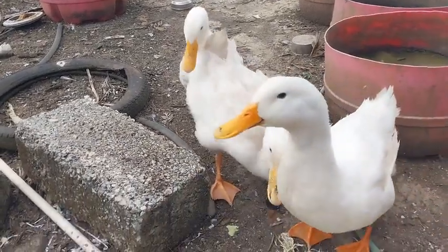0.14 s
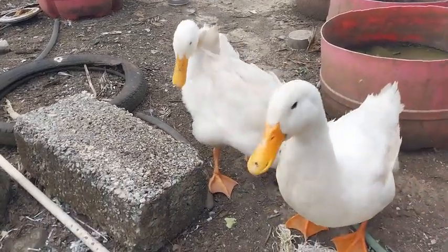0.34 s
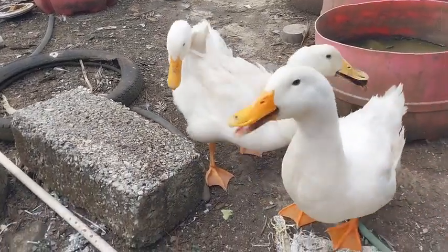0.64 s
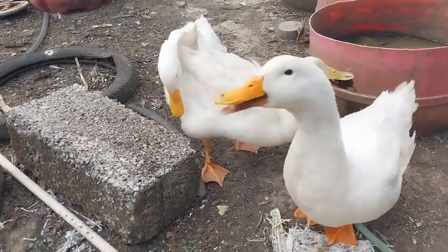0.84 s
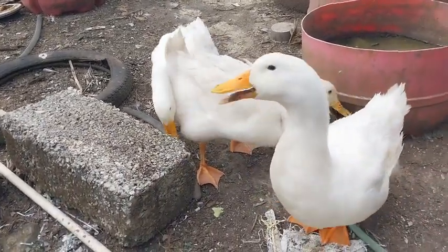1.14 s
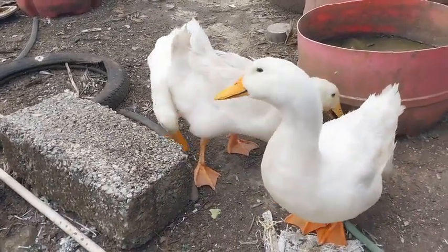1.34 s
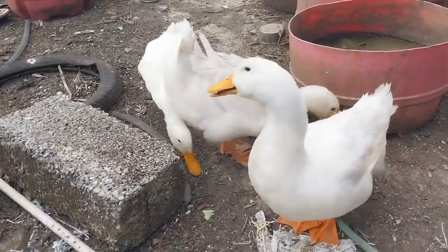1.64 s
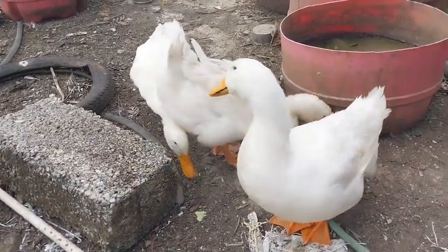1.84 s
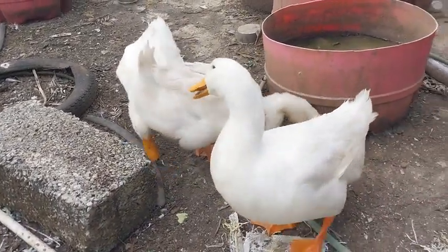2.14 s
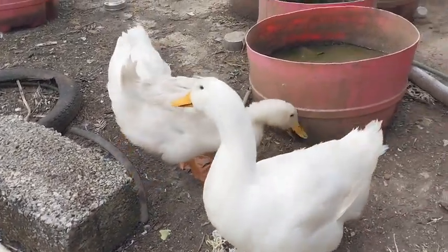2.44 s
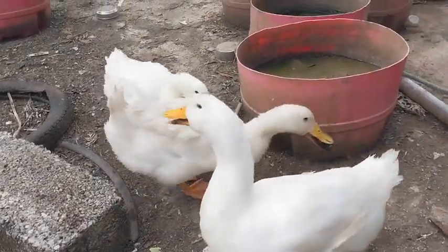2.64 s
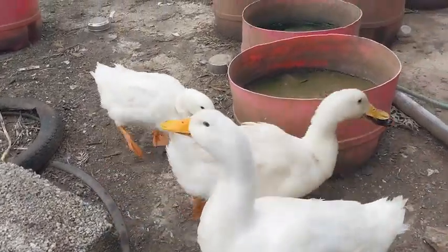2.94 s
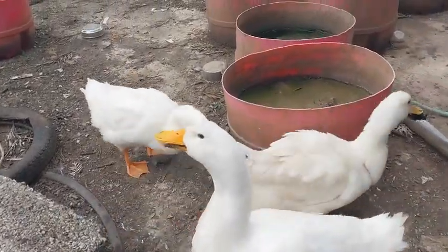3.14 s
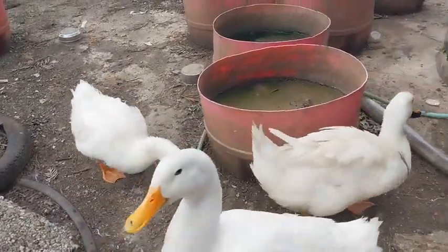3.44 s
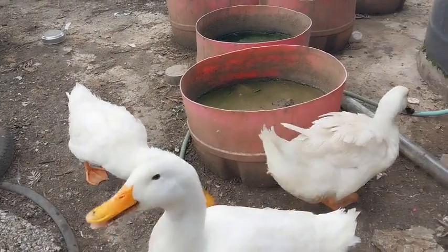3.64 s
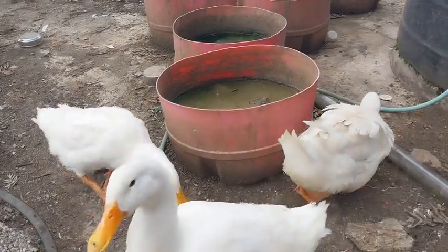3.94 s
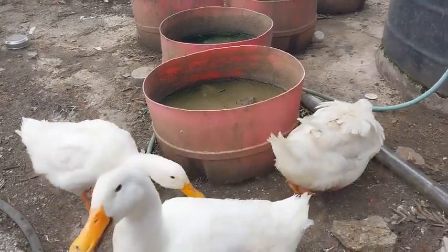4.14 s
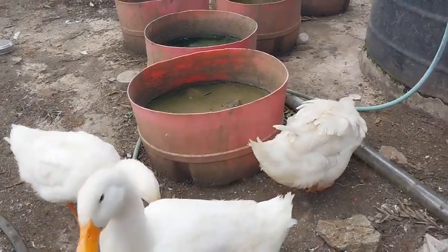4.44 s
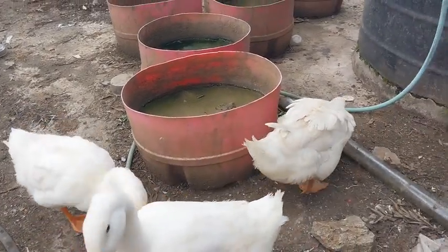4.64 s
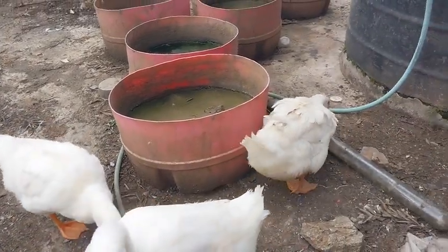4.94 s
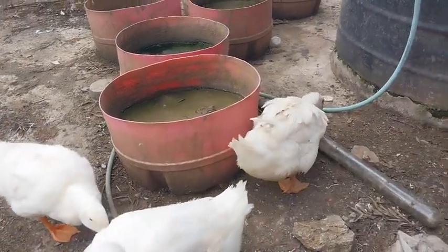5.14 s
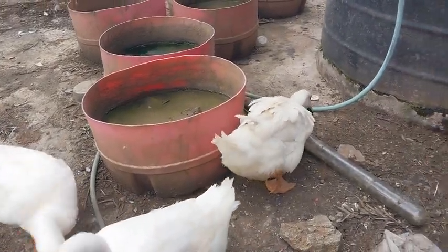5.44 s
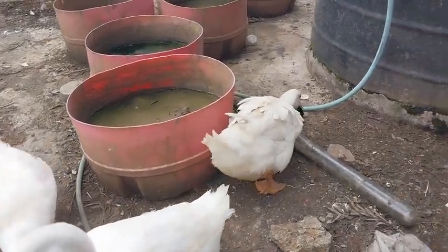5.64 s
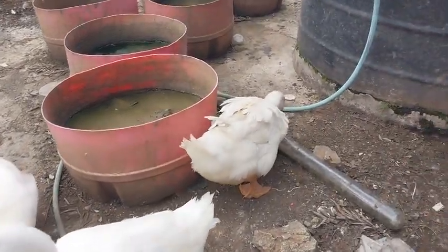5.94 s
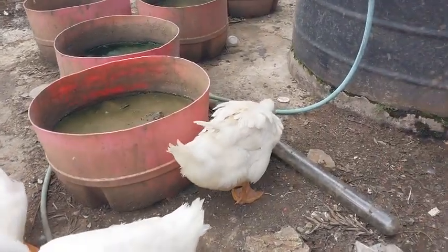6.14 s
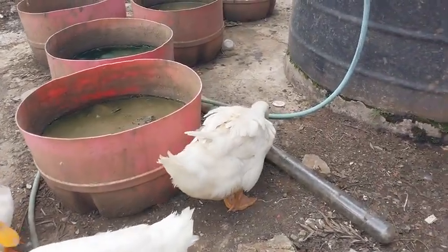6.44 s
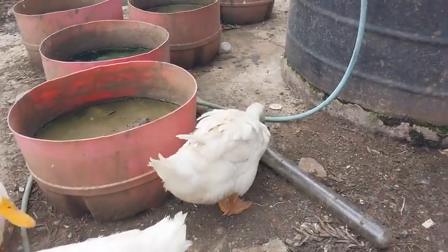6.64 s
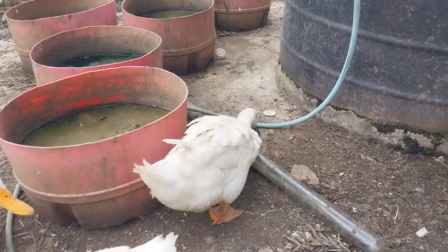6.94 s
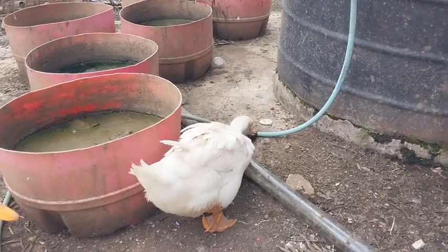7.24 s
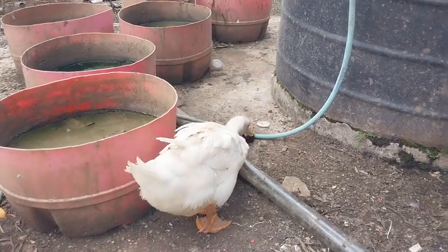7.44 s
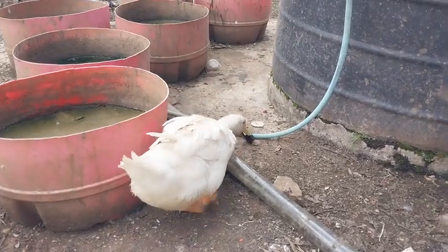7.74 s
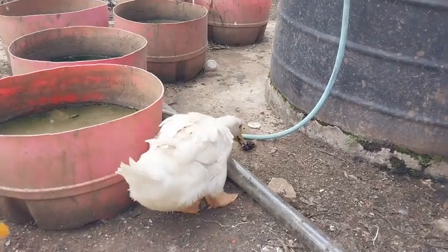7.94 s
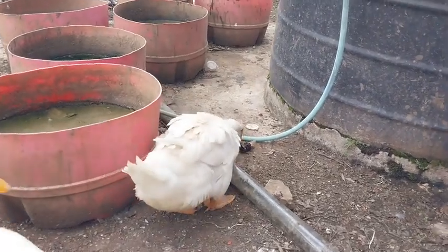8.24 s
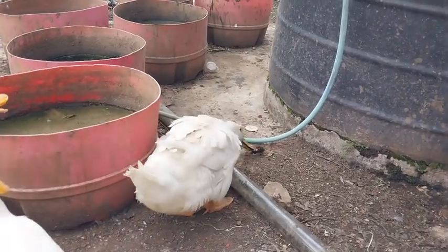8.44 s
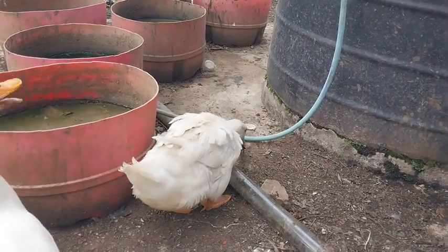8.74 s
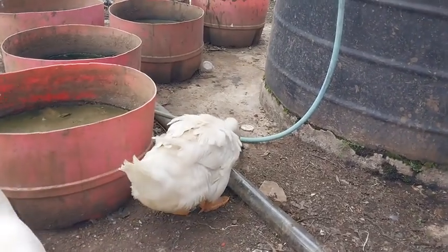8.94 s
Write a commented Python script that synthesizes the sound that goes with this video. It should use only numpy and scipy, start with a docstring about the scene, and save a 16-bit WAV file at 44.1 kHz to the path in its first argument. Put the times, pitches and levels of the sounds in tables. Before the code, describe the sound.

An outdoor earthen yard, heard in close stereo, with a quiet far rumble, faint wavering hum, low murmur and treble twitter throughout. At 0 s a drake gives a strong hoarse rasp, a tenth of a second or less of fluttering air, then more at 0.45, 0.63 and a loud one at 0.83. Pairs follow every half second or so until 4.4 s. Between them a duck clucks with a soft pop, a swift falling whistle and a low grunt near 200 Hz, strongest around 2.2 to 3.6 s. A brighter tick lands at 2.5 s, another at 3.9. From 4.5 to 5.3 s the ducks pause; a thin distant whistle wavers at 4.9. Rasps return at 5.3, spaced wider, with longer weak ones at 5.8 and 6.7. Foot and bill ticks thicken on the left after 7.4 s. Clucks resume at 7.6, with firm grunts at 8.7 and 8.9 among closing rasps.

```python
"""An earthen yard among barrels, two microphone ports at arm's length from domestic ducks, about nine seconds.
From the start a far rumble, a wavering hum, a low murmur and treble twitter lie under the birds: shaped noise.
At once a drake rasps hoarsely in runs, flapped air bursts through resonances, and a duck clucks between:
a pop (a struck resonance), a falling whistle (a gliding tone) and a low grunt (pulses through a windpipe).
Soon bills and feet tick on the litter (short noise bursts), then a far bird whistles thinly now and again."""
import sys
import numpy as np
from scipy import signal
from scipy.io import wavfile
from scipy.ndimage import uniform_filter1d

SR = 44100
rng = np.random.default_rng(int(sys.argv[2]) if len(sys.argv) > 2 else 0)


def unload_wav(signal):
    """Save mono or channel-first audio to the path in sys.argv[1] as 16-bit WAV at rate SR, clipped to [-1, 1]."""
    wavfile.write(
        sys.argv[1],
        SR,
        np.round(np.clip(np.atleast_2d(signal).T, -1, 1) * 32767).astype(np.int16),
    )


N = 401304
TIME = np.arange(N) / SR


def from_db(db):
    """Amplitude factor of a level in dB."""
    return 10 ** (np.asarray(db) / 20)


def rms_one(x):
    """Scale a signal to an rms of 1."""
    return x / np.sqrt(np.mean(x ** 2) + 1e-20)


def in_time(rows):
    """Columns of a table joined by straight lines in time."""
    s, *columns = np.transpose(rows)
    return [np.interp(TIME, s, column) for column in columns]


def played(calls, fade_s=0.0018):
    """Columns of a list of calls, and a gate that is open only while one sounds."""
    gate = sum((TIME >= call[0][0]) & (TIME <= call[-1][0]) for call in calls).clip(0, 1)
    soft_gate = uniform_filter1d(gate * 1., max(int(fade_s * SR), 1))
    return *in_time(np.concatenate(calls)), soft_gate


def at_hz(points, hz):
    """Value of a (Hz, value) curve, straight over log frequency."""
    curve_hz, values = np.transpose(points)
    return np.interp(np.log(hz), np.log(curve_hz), values)


def drift(rate_hz):
    """Slow chance of spread 1, drawn at every 40th sample through two equal low-pass poles."""
    r = np.exp(-80 * np.pi * rate_hz / SR)
    chance = rng.standard_normal(N // 40 + 2002)
    slow = signal.lfilter([1], [1, -2 * r, r * r], chance)[2000:]   # settled part
    return np.interp(np.arange(N) / 40, np.arange(len(slow)), rms_one(slow))


def resonate(x, modes):
    """Parallel resonances of alternating sign, each applied twice so that the valleys stay dark."""
    out = 0
    for k, (hz, width_hz, level_db) in enumerate(modes):
        r = np.exp(-np.pi * width_hz / SR)
        section = [(1 - r * r) / 2, 0, (r * r - 1) / 2, 1, -2 * r * np.cos(2 * np.pi * hz / SR), r * r]
        ringing = signal.sosfilt([section, section], x + 1e-18)
        out = out + (-1) ** k * from_db(level_db) * ringing
    return out


def clicks(rows):
    """A click train from (s, dB) rows."""
    out = np.zeros(N)
    out[[round(row[0] * SR) for row in rows]] = from_db([row[1] for row in rows])
    return out


def placed(x, lag_ms, pan_db):
    """Two microphone ports: the right one hears later, and the level difference is split between them."""
    right = np.interp(TIME - lag_ms / 1000, TIME, x)
    return np.array([x * from_db(pan_db / 2), right * from_db(-pan_db / 2)])


def arch(s, length, rise_s, fall_s, shoulder_db, edge_db):
    """Times and dB of a call that rises, swells to its middle and falls."""
    times = np.array([s - rise_s, s, s + length / 2, s + length, s + length + fall_s])
    return times, np.array([edge_db, shoulder_db, 0, shoulder_db, edge_db])


def yard(level_db=-67, patchy_db=3.2, shared=.15):
    """Distant rumble and rustle in flickering half-octave noise bands, with a hum of narrow noise."""
    # Far spectrum. Each row: frequency in Hz, relative level in dB per Hz.
    spectrum = [(25, -10.5), (60, -8), (190, -2.5), (290, -12.5), (800, -13), (1500, -25), (3000, -24),
                (5500, -25.5), (8200, -29), (9700, -30), (10000, -55), (12000, -70)]
    # Its lean to the left port. Each row: frequency in Hz, left-right level in dB.
    balance = [(60, -4.5), (600, -2), (2000, -1.2), (5000, 10), (8500, -16.5)]
    # How alike the ports hear it. Each row: frequency in Hz, left-right likeness (1 is identical).
    likeness = [(60, 0.75), (300, 0.18), (1000, 0.2), (4000, .15), (9000, 0.087)]
    # Hum. Each row: frequency in Hz, width in Hz, level in dB rms.
    hum_tones = [(54, 9.2, -88), (99, 14, -77.5)]
    out, together, edges = 0, drift(4.2), 25 * 2 ** np.arange(0, 9, .5)
    white = rng.standard_normal((2, 2, N))   # neighbouring bands take different noise
    for k, (low, high) in enumerate(zip(edges, edges[1:])):
        band = signal.butter(2, [low, high], "band", fs=SR, output="sos")
        mid, side = signal.sosfilt(band, white[k % 2])
        hz = np.sqrt(low * high)
        alike, pan_db = np.clip(at_hz(likeness, hz), -1, 1), at_hz(balance, hz)
        flicker_db = patchy_db * (shared * together + drift(12))
        gain = from_db(at_hz(spectrum, hz) + flicker_db + [[pan_db / 2], [-pan_db / 2]])
        out = out + gain * (np.sqrt(1 + alike) * mid + np.sqrt(1 - alike) * side * [[1], [-1]])
    hum = 0
    for hz, width_hz, db in hum_tones:
        hum = hum + from_db(db) * rms_one(resonate(white[0, 0], [(hz, width_hz, 0)]))
    return from_db(level_db) * rms_one(out) + hum


def far_twitter():
    """Faint twitter and rustle in the treble: eight noise bands flicker apart under one level."""
    # Each row: time in seconds, mean level of the two ports in dB.
    twitter_level = [(0.0, -58.5), (0.35, -75), (1.59, -77), (2.1, -62), (4.26, -77.5), (4.38, -59),
                     (4.61, -79.5), (6.79, -73.5), (7.12, -86), (7.86, -57), (8.19, -77), (8.82, -54),
                     (9.0, -106), (9.1, -53)]
    air, twitter = rng.standard_normal(N), 0
    for chirp_hz in np.geomspace(3300, 7200, 8):
        twitter = twitter + resonate(air, [(chirp_hz, 450, 0)]) * from_db(5 * drift(12))
    return rms_one(twitter) * from_db(in_time(twitter_level)[0] + [[-2.5], [2.5]])


def low_murmur():
    """Dull, lumpy low noise that swells around the calls, like their reverberation."""
    # Each row: time in seconds, level in dB about which the lumps vary.
    murmur_level = [(0.0, -64), (0.88, -79), (1.09, -63.5), (1.62, -85), (2.15, -56), (2.36, -81),
                    (3.57, -61.5), (3.7, -84), (4.99, -84.5), (5.47, -65.5), (6.54, -82), (7.83, -63),
                    (8.31, -83.5), (9.1, -65)]
    noise = rms_one(resonate(rng.standard_normal(N), [(188, 67, 6.5), (356, 750, -19)]))
    level_db = in_time(murmur_level)[0] + 4.1 * drift(15)
    return placed(noise * from_db(level_db), lag_ms=.1, pan_db=-2.2)


def rasp(s, length, db, gained_db, deep_db, upper_db, bill_db, hiss_db):
    """Control points of one rasp: the bill is widest in the middle, the windpipe comes forward at the end."""
    bill_shut_db, hiss_shut_db, windpipe_lingers_db = -16.5, 2.5, 2.5
    times, shape_db = arch(s, length, rise_s=0.032, fall_s=0.027, shoulder_db=-3, edge_db=-35)
    shut = np.abs(np.linspace(-1, 1, len(times)))
    lean = np.sign(times - times[2]) / 2   # -1/2 before the middle, 1/2 after
    return np.transpose([times, db + shape_db + gained_db * lean, deep_db + windpipe_lingers_db * lean,
                         upper_db + 0 * shut, bill_db + bill_shut_db * shut, hiss_db + hiss_shut_db * shut])


def flapping(modes, phase, depth_db, slap_db, own_db):
    """Each flap slaps shut and lets out a gust that dies; every resonance also swells on its own."""
    slaps = np.diff(np.floor(phase), prepend=0) * from_db(slap_db + 1.3 * drift(60))
    gusts = from_db(-depth_db * (phase % 1)) * rng.standard_normal(N) + slaps
    out = 0
    for hz, width_hz, level_db in modes:
        swelling = gusts * from_db(own_db * drift(33))
        out = out + from_db(level_db) * rms_one(resonate(swelling, [(hz, width_hz, 0)]))
    return rms_one(out)


def drake(flaps_per_s=64, jitter_db=1.37):
    """Air bursts past an unevenly flapping membrane into windpipe, throat and bill, with hiss above."""
    # Rasps. Each row: second at which it is nearly full, seconds it stays so, throat level in dB,
    # dB gained meanwhile, then in dB relative: windpipe, upper throat tone, bill, hiss.
    rasp_rows = [(0.006, 0.061, -28, 3.5, -16.5, -0.5, -8.5, -18),
                 (0.447, 0.039, -35, 2.0, -6, -1.5, -7, -14.5),
                 (0.63, 0.059, -30.5, -0.5, -10, -4, -3.5, -13.5),
                 (0.833, 0.05, -26, 7, -14.5, -8, -7.5, -16.5),
                 (1.204, 0.067, -38, 1.0, -4.5, -1, -8, -15.5), (1.528, 0.058, -40, -2.5, -4, 3, -8, -11),
                 (1.74, 0.043, -35.5, -2, -4, -0.9, -4.5, -10.5),
                 (2.107, 0.049, -37, 0, -10.5, -14, -6.5, -17),
                 (2.293, 0.049, -31.5, 6, -20.5, -11, -5, -17.5), (2.61, 0.058, -40, -2, -7.5, 3, -3, -10),
                 (2.805, 0.06, -35, 4, -10, -3.5, -6, -15), (3.121, 0.05, -33.5, 3.5, -11, -4, -8.5, -17.5),
                 (3.316, 0.028, -38, 9, -8.5, 0.5, -10, -17),
                 (3.618, 0.044, -31.5, -3.5, -4.5, 3.5, -1.5, -5), (3.808, 0.058, -36, 3.5, -6, 2, 1, -8.5),
                 (4.206, 0.056, -33, -1.5, -8, 3.7, -4.5, -17.5),
                 (4.369, 0.043, -30, 3, -10, -0.5, -7.5, -18), (5.315, 0.037, -33, 0, -7, 9.5, -5, -12.5),
                 (5.472, 0.045, -33.5, 2.5, -6, 3, -7, -14), (5.821, 0.13, -41, -13, -3, 3, -15, -15.5),
                 (6.177, 0.046, -39.5, -1, -3.5, 4.5, -7.5, -11),
                 (6.371, 0.049, -36.5, 4.5, -7.5, 6, -3, -10),
                 (6.743, 0.133, -35, -3, -13, -4, -20.5, -22.5),
                 (7.143, 0.053, -37.5, -2.5, -9, 1, -16, -14.5),
                 (7.302, 0.051, -37.5, 8, -10, 3.5, -9.5, -16),
                 (7.711, 0.05, -34.6, 2.5, -9, 5.5, -9.5, -16.5),
                 (7.92, 0.046, -29, -1.5, -11, 3, -9.9, -16.5),
                 (8.235, 0.055, -40.5, -0.5, -2, 5.5, -5, -10), (8.439, 0.051, -34.5, 3, -8, 4, -8, -6.5),
                 (8.741, 0.058, -34, -3.5, -3.5, 6.5, -8, -9), (8.938, 0.066, -32.5, -0.5, -7, 5.7, -5, -6)]
    # The bill snaps open before a rasp. Each row: second, strength in dB ahead of its resonances.
    snap_rows = [(0.428, -37), (1.187, -34), (1.505, -45), (2.088, -36), (2.78, -44), (3.103, -38),
                 (3.303, -44.5), (3.598, -28.5), (4.187, -39.5), (5.294, -42), (5.793, -41.5),
                 (6.157, -40.5), (6.722, -43.5), (7.123, -40.5), (7.693, -34.5), (8.221, -38.5)]
    # Where he stands. Each row: second, ms by which the right port lags, left-right level in dB,
    # left-right level of the hiss in dB.
    place = [(0, 0, 0, -1.5), (2.5, .02, 0, -2), (3.4, .04, 0, -2.5), (4.2, .18, .5, -3.5), (6, .22, 0, -5),
             (7.5, .32, .8, -4), (9.1, .22, 0, -6)]
    # Resonances of throat, bill, windpipe and hiss. Each row: frequency in Hz, width in Hz, relative dB.
    throat_tones, bill_tones = [(1718, 270, 1.5), (2037, 159, -1.5)], [(2539, 220, 3), (2907, 230, -4.5), (3165, 180, -8)]
    windpipe_tones, hiss_tones = [(1037, 140, -10), (1367, 190, 5.5)], [(4000, 440, -6), (4500, 120, -7), (5090, 670, -0.5),
                                                    (5564, 550, -4.5), (7040, 170, -19.5)]

    level_db, deep_db, upper_db, bill_db, hiss_db, gate = played([rasp(*row) for row in rasp_rows])
    phase = np.cumsum(flaps_per_s * from_db(jitter_db * drift(30))) / SR   # in flaps
    windpipe = from_db(deep_db) * flapping(windpipe_tones, phase, depth_db=11, slap_db=12, own_db=2)
    lower, (hz, width_hz, db) = throat_tones
    throat = flapping([lower, (hz, width_hz, db + upper_db)], phase, depth_db=17, slap_db=16, own_db=2)
    bill = from_db(bill_db) * flapping(bill_tones, phase, depth_db=17, slap_db=16, own_db=2.5)
    voice = from_db(level_db) * gate * (windpipe + throat + bill)
    hiss = flapping(hiss_tones, phase, depth_db=8, slap_db=10, own_db=3)
    hiss = from_db(level_db + hiss_db) * gate * hiss
    snap = resonate(clicks(snap_rows), [(560, 187, 32.2), (1065, 210, 30.7), (4660, 540, 8)])
    lag_ms, pan_db, hiss_pan_db = in_time(place)
    return placed(voice + snap, lag_ms, pan_db) + placed(hiss, lag_ms, hiss_pan_db)


def echoes(x, thin_hz=500, dull_hz=3500):
    """A few thin, dull reflections, a little later on the right."""
    # Ground and barrels. Each row: delay at the left port in seconds, level in dB.
    reflections = [(.0043, -11.5), (.011, -7), (0.021, -17), (.041, -32), (0.069, -36)]
    band = signal.butter(1, [thin_hz, dull_hz], "band", fs=SR, output="sos")
    dull, out = signal.sosfilt(band, x), np.zeros_like(x)
    for s, db in reflections:
        for side, stretch in enumerate((1, 1.13)):
            lag = round(s * stretch * SR)
            out[side, lag:] += from_db(db) * dull[side, :-lag]
    return out


def pops(air_db=-10, air_t60_s=.12):
    """A closed windpipe lets go: a few low cycles, with a little air dying away."""
    # Each row: second at which a cluck begins, level in dB ahead of the resonances, pitch in Hz.
    pop_rows = [(0.029, -46, 234), (0.235, -46.5, 226), (0.857, -40.5, 210), (1.055, -43.5, 232.5),
                (1.274, -40.5, 236), (1.743, -33.5, 216.5), (1.937, -41, 238.4), (2.146, -38.5, 245),
                (2.583, -34, 237.4), (3.329, -44, 212.5), (3.504, -41, 230), (5.499, -42.5, 254),
                (7.581, -41.5, 226.3), (7.77, -46.5, 301.6), (8.65, -37, 265), (8.862, -37.5, 225.8)]
    out, kick, age = np.zeros(N), np.eye(1, SR // 10)[0], TIME[:SR // 10]
    for s, db, hz in pop_rows:
        air = resonate(rng.standard_normal(len(age)), [(950, 810, 9.5), (450, 370, 4.0)])
        air = air * from_db(air_db - 60 * age / air_t60_s)
        cycles = resonate(kick, [(hz, 130, 42), (1100, 500, 10)])
        start = round(s * SR)
        out[start:start + len(kick)] += from_db(db) * (cycles + air)
    return out


def whistle(s, length, top_s, top_hz, db):
    """Control points of one whistle: holds its pitch, then falls steadily and dulls; it swells throughout."""
    fall_oct_per_s, dulls_db_per_s = 14, 345.5   # overtones fade as the pitch falls
    swell_db, edge_s, edge_db = 6, .005, -20
    age = np.array([-edge_s, 0, np.clip(top_s, 0, length), length, length + edge_s])
    level_db = db + swell_db * (age / length - .5) + edge_db * ((age < 0) | (age > length))
    falling_s = (age - top_s).clip(0)
    pitch_hz = top_hz * 2 ** (-fall_oct_per_s * falling_s)
    return np.transpose([s + age, pitch_hz, level_db, -dulls_db_per_s * falling_s])


def whistles(air_db=-12):
    """A falling tone with weak overtones and some air."""
    # Each row: start in seconds, length in seconds, seconds on the top pitch, top pitch in Hz,
    # level in dB halfway through.
    whistle_rows = [(.062, 0.031, 0.0015, 960, -44.5), (.262, 0.064, 0.022, 1220, -48),
                    (.472, 0.041, 0.0036, 1180, -40), (.872, 0.039, 0.0016, 1170, -40.5),
                    (1.086, .016, 0.014, 1160, -50), (1.112, 0.031, 0.0027, 1200, -48.5),
                    (1.29, 0.051, 0.0038, 1330, -46.5), (1.77, 0.037, 0.0019, 1000, -45.5),
                    (1.965, 0.066, 0.02, 1220, -46.5), (2.174, 0.029, 0.0018, 1200, -44),
                    (2.825, 0.046, 0.0014, 1240, -44.5), (3.138, 0.027, 0.0013, 920, -45.5),
                    (3.352, 0.025, 0.0015, 1150, -51), (7.612, 0.027, 0.0016, 886, -45),
                    (7.808, 0.019, 0.0013, 1030, -47)]
    hz, level_db, dull_db, gate = played([whistle(*row) for row in whistle_rows])
    turn = 2 * np.pi * np.cumsum(hz * (1 + 0.015 * drift(88))) / SR
    overtones = sum(from_db(db) * np.sin(k * turn) for k, db in ((2, -20), (3, -13.5), (4, -14)))
    tone = np.sqrt(2) * (np.sin(turn) + from_db(dull_db) * overtones)
    air = rms_one(resonate(rng.standard_normal(N), [(1119, 210, 0.0), (4240, 2100, -10.0)]))
    return from_db(level_db) * gate * (tone * from_db(2.9 * drift(70)) + from_db(air_db) * air)


def grunt(s, length, hz, db, over_db):
    """Control points of one grunt; sag runs from 1 to -1 and the overtones fade with it."""
    overtones_fade_db = 2.5   # from start to end
    times, shape_db = arch(s, length, rise_s=.012, fall_s=0.018, shoulder_db=-3, edge_db=-17.5)
    sag = 1 - 2 * (times - times[0]) / (times[-1] - times[0])
    return np.transpose([times, hz + 0 * sag, db + shape_db, over_db + overtones_fade_db * sag / 2, sag])


def grunts(breath_db=-28, chest_db=-18, hiss_db=-16, fall=0.18):
    """A few low pulses through the windpipe, sagging in pitch; the body thumps below, air hisses above."""
    # Each row: second at which it is nearly full, seconds it stays so, middle pitch in Hz, level in dB,
    # overtones in dB relative.
    grunt_rows = [(0.085, 0.01, 206.5, -39, -8), (0.313, 0.012, 208.8, -40, -11.5),
                  (0.502, 0.015, 198.0, -33.5, -5.5), (0.908, 0.014, 209.0, -36, -7),
                  (1.142, 0.015, 215.0, -38.5, -6.5), (1.32, 0.027, 222.4, -32, -8.4),
                  (1.798, 0.013, 227.3, -38.5, -7.5), (2.02, 0.017, 209.9, -33, -11),
                  (2.202, 0.02, 233.0, -27.5, -9), (2.619, 0.023, 229.7, -30.5, -5),
                  (2.856, 0.017, 220.7, -29.5, -1), (3.382, 0.01, 223.0, -33, -6.5),
                  (3.554, 0.024, 226.5, -28.5, -6), (5.39, 0.024, 216, -55.5, 5.5),
                  (7.639, 0.022, 216, -51.5, -19), (7.836, 0.019, 206.3, -33.5, -9),
                  (8.678, 0.045, 197.6, -27, -2), (8.891, 0.016, 202.2, -26.5, -1),
                  (9.086, 0.048, 228.5, -38, 5)]
    # Resonances of the windpipe. Each row: frequency in Hz, width in Hz, relative level in dB.
    tract = [(317, 79, 6.5), (486, 280, 1.5), (590, 840, -5.5), (1067, 140, 2.5), (1363, 406, -3.5),
             (1876, 300, -29)]
    hz, level_db, over_db, sag, gate = played([grunt(*row) for row in grunt_rows], fade_s=0.0027)
    phase = np.cumsum(hz * (1 + fall * sag + .03 * drift(70))) / SR   # in cycles
    pulses = np.diff(np.floor(phase - .2), prepend=0) * from_db(2.5 * drift(120))
    breath = rng.standard_normal(N) * (1 + np.cos(2 * np.pi * phase))
    overtones = rms_one(resonate(pulses + from_db(breath_db) * breath, tract))
    hiss = from_db(hiss_db) * rms_one(resonate(breath, [(3620, 1200, .5), (4800, 670, -2)]))
    thump = rms_one(resonate(rng.standard_normal(N), [(152.0, 71, 0), (85, 76, -5)]))
    chest = from_db(chest_db) * thump
    swell = from_db(uniform_filter1d(level_db, SR // 130)) * gate   # pressure builds and falls smoothly
    fundamental = np.sqrt(2) * np.sin(2 * np.pi * phase)
    return swell * (fundamental + from_db(over_db) * (overtones + hiss) + chest)


def duck():
    """Clucks made of pops, whistles and grunts from one place."""
    # Where she stands. Each row: second, ms by which the right port lags, left-right level in dB.
    place = [(0, 0.032, -2), (3.6, .07, -1.9), (7.5, 0.16, -3.5), (9.1, 0.21, -2)]
    return placed(pops() + whistles() + grunts(), *in_time(place))


def ticks():
    """Bills and feet on litter: short dying bursts of bright noise."""
    # Each row: second, level in dB ahead of the resonances, left-right level in dB,
    # seconds to die by 60 dB, body near 3.7 kHz in dB relative.
    tick_rows = [(0.345, -49.5, -10, 0.027, 7.5), (0.805, -67.5, -28, 0.045, 11),
                 (0.9127, -61, -23, 0.047, -5), (0.9403, -54.5, -17, 0.093, 2), (1.9975, -57, -17, 0.11, 3),
                 (2.2596, -61, -14, 0.092, 4), (2.4219, -68.5, -23, 0.057, -0.5),
                 (2.5082, -40, -8.5, 0.039, 2.5), (3.878, -44.5, -13, 0.055, 7.5),
                 (5.6886, -67, -16, 0.049, 13), (6.314, -60, -24, 0.03, -20.5),
                 (6.4384, -60.5, -10, 0.04, 15), (6.8093, -61, -19.5, 0.099, 10.5),
                 (7.4404, -59, -12, 0.053, -2), (7.604, -59, -13, 0.059, -5), (7.7212, -56, -21, 0.05, 7),
                 (7.7429, -54.5, -16, 0.14, 15), (8.0466, -71, -13, 0.079, -15),
                 (8.1703, -61, -15, 0.25, 4.5), (8.4261, -58.5, -20, 0.16, 6),
                 (8.545, -61, -18, 0.085, -19), (8.5692, -51, -12, 0.11, 3.5),
                 (8.5864, -48, -15.0, 0.087, 3.5), (8.725, -56, -17, 0.042, 6)]
    out, age = np.zeros((2, N + SR // 8)), TIME[:SR // 8]
    for s, db, pan_db, t60_s, body_db in tick_rows:
        dying = from_db(db - 60 * age / np.clip(t60_s, .005, .3))
        noise = rng.standard_normal(len(age)) * dying
        burst = resonate(noise, [(8300, 7300, 0.61), (3680, 3500, body_db)])
        start = round(s * SR)
        out[:, start:start + len(age)] += burst * from_db([[pan_db / 2], [-pan_db / 2]])
    return out[:, :N]


def peep(s, length, hz, db):
    """Control points of one far whistle: pitch and level arch over the middle on a parabola."""
    arch_hz_per_s, edge_db = 1400, -14   # mean pitch slope of each half
    side = np.linspace(-1, 1, num=9)
    pitch_hz = hz - arch_hz_per_s * length / 2 * side ** 2
    return np.transpose([s + length * (side + 1) / 2, pitch_hz, db + edge_db * side ** 2])


def far_whistle():
    """A far bird's thin wavering tone, a quarter cycle apart at the two ports."""
    # Each row: start in seconds, length in seconds, pitch at the middle in Hz, level there in dB.
    peep_rows = [(0.752, 0.073, 2294, -59), (1.444, 0.12, 2190, -72), (1.857, 0.079, 2145, -70),
                 (4.907, 0.293, 2300, -68), (7.63, .07, 2157, -70)]
    hz, level_db, gate = played([peep(*row) for row in peep_rows], fade_s=.015)
    turn = 2 * np.pi * np.cumsum(hz * (1 + 0.012 * drift(40))) / SR
    tone = np.exp(1j * turn) * from_db(level_db + 5.0 * drift(35)) * gate
    return np.sqrt(2) * np.array([tone.real, tone.imag])


def scene():
    """Near sounds with their echoes over the low murmur and the far sounds."""
    near = drake() + duck() + ticks()
    far = yard() + far_twitter() + far_whistle()
    return near + echoes(near) + low_murmur() + far


def record(dry):
    """A steep low-pass cuts the top."""
    return signal.sosfilt(signal.cheby2(12, 70, 11300, fs=SR, output="sos"), dry)   # stopband from 11300 Hz


dry = scene()
out = record(dry)
unload_wav(out)
```